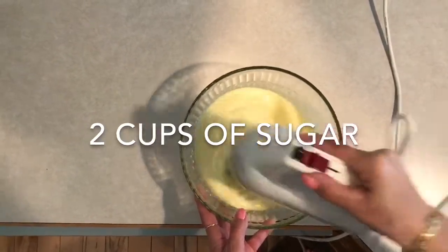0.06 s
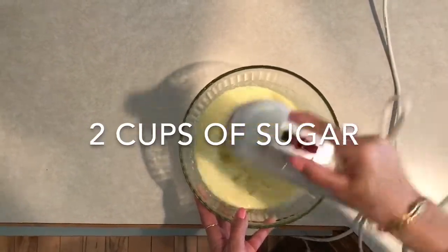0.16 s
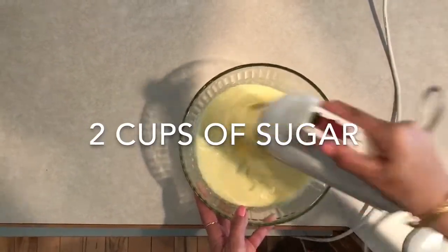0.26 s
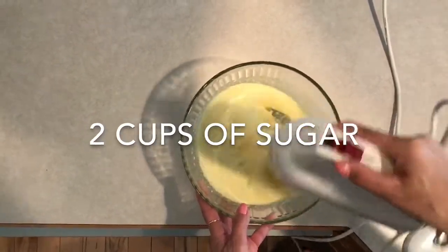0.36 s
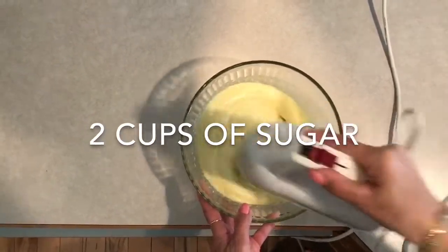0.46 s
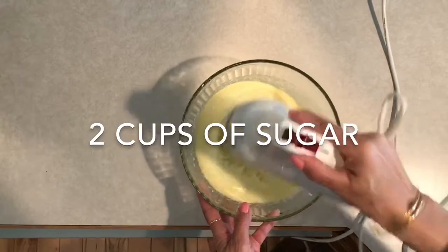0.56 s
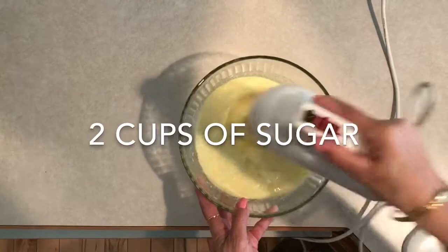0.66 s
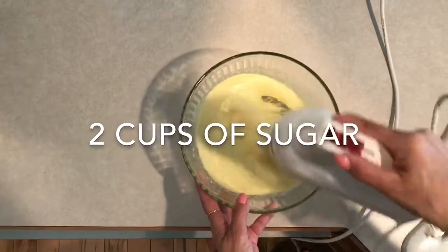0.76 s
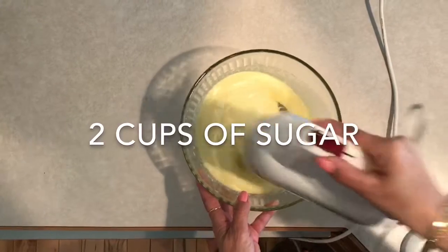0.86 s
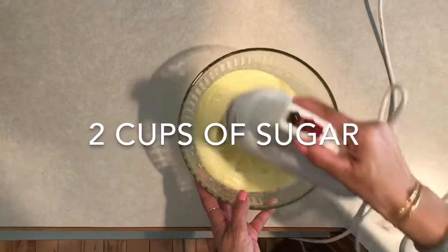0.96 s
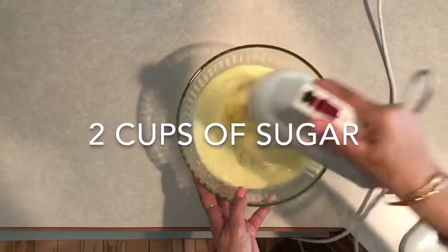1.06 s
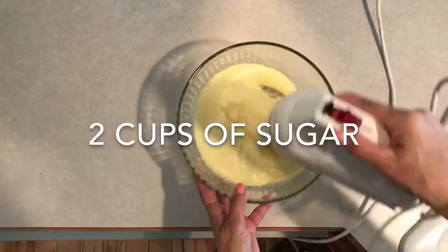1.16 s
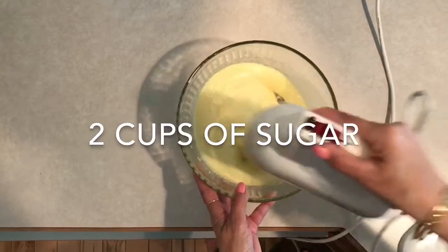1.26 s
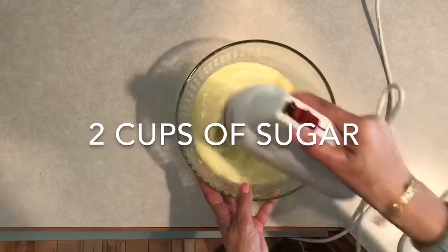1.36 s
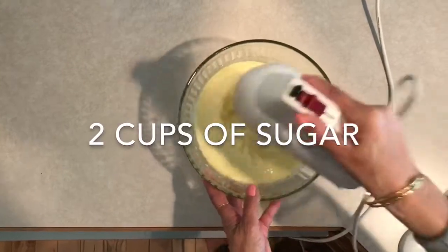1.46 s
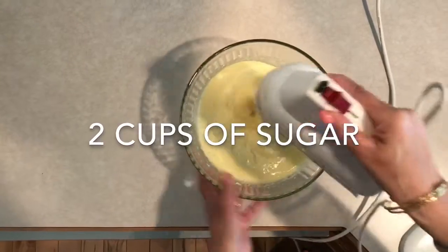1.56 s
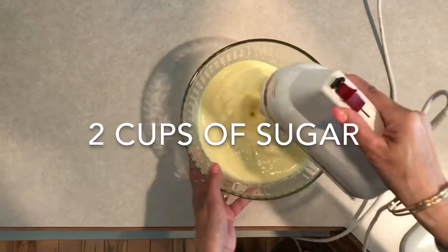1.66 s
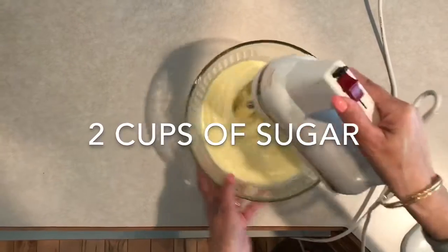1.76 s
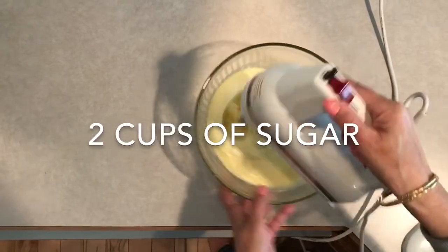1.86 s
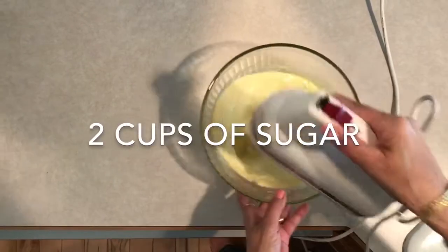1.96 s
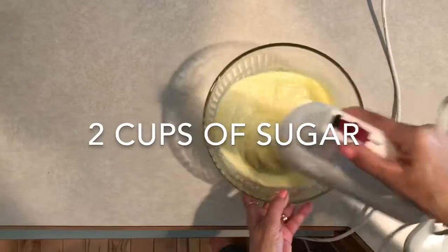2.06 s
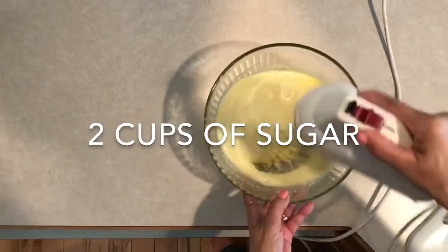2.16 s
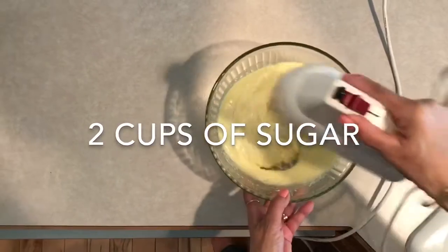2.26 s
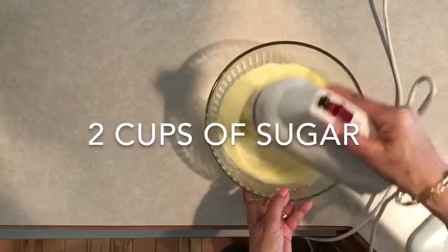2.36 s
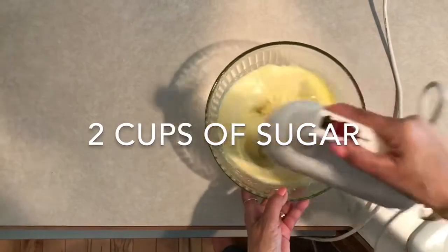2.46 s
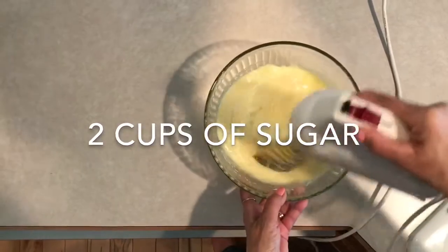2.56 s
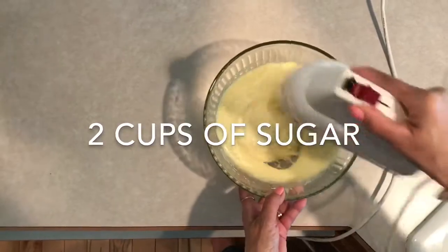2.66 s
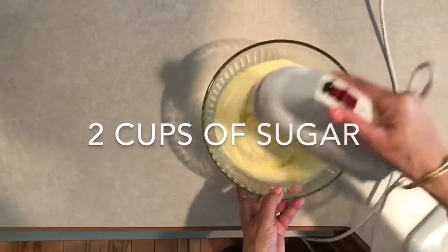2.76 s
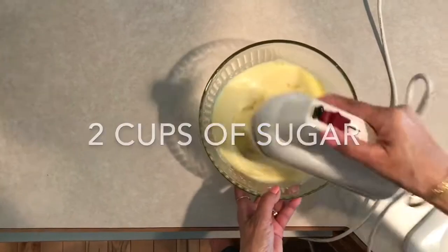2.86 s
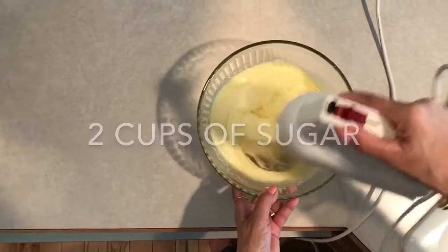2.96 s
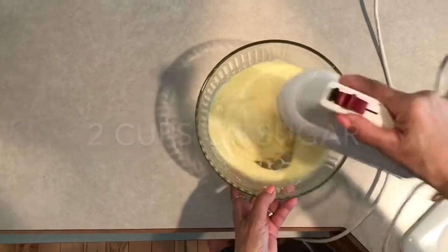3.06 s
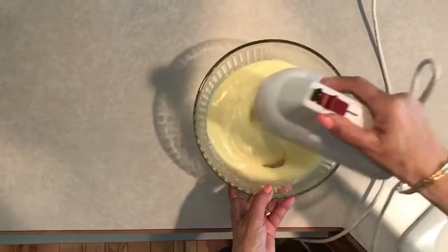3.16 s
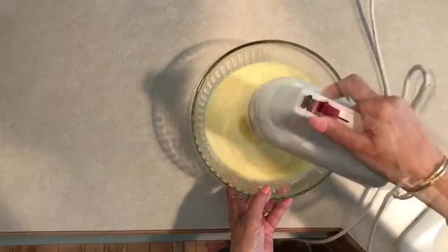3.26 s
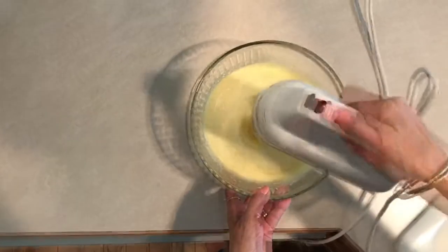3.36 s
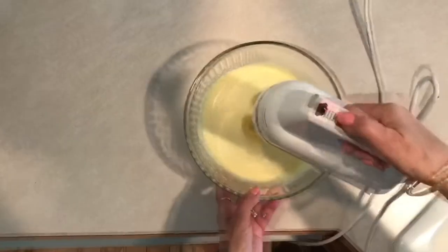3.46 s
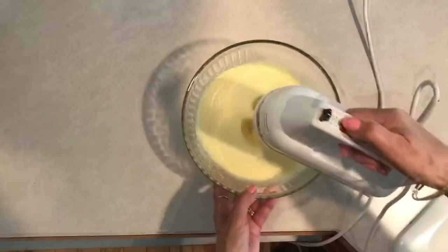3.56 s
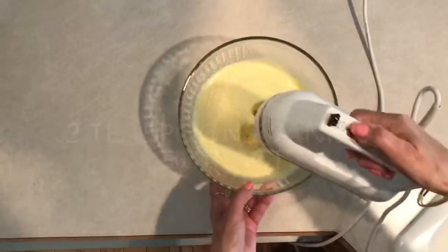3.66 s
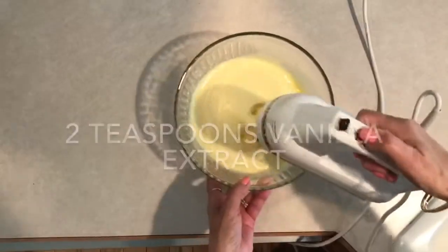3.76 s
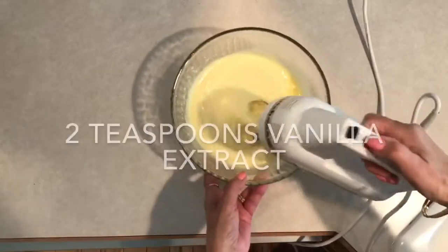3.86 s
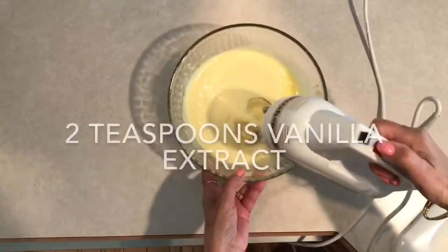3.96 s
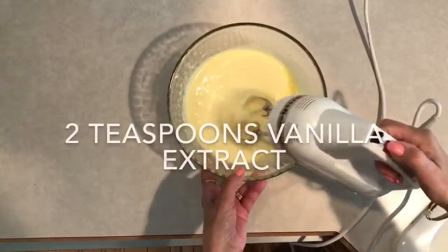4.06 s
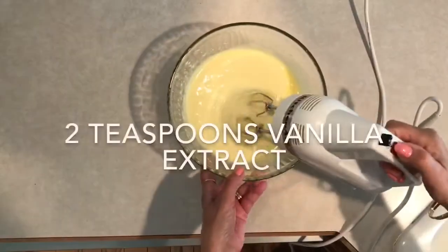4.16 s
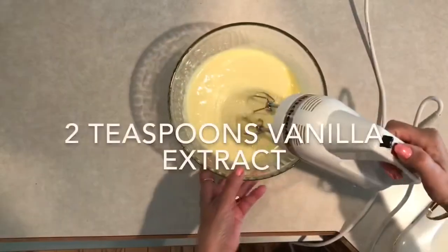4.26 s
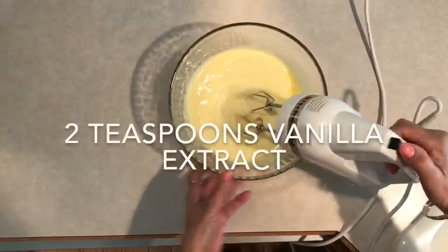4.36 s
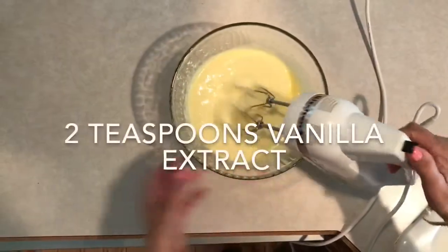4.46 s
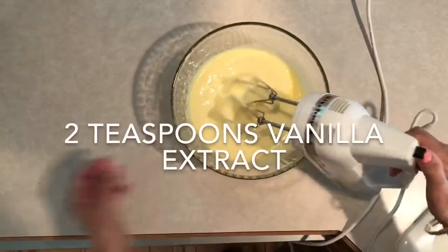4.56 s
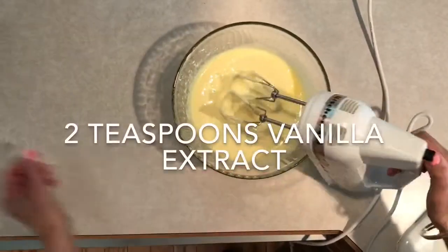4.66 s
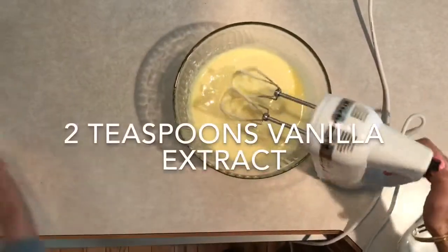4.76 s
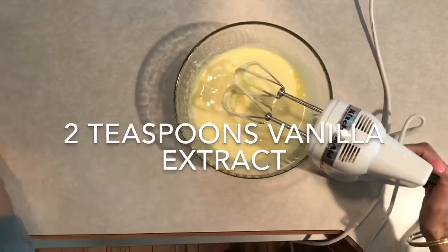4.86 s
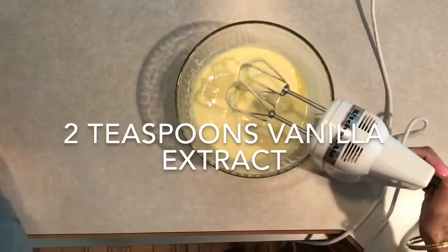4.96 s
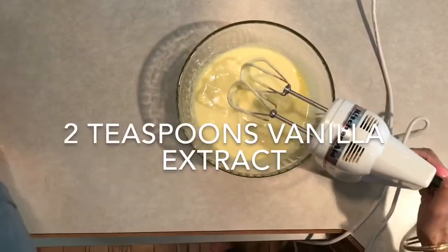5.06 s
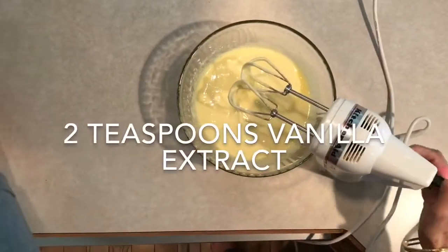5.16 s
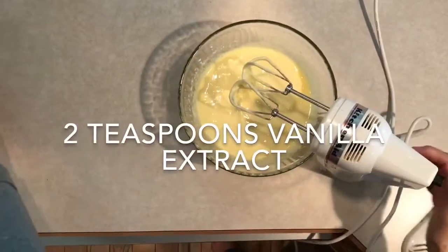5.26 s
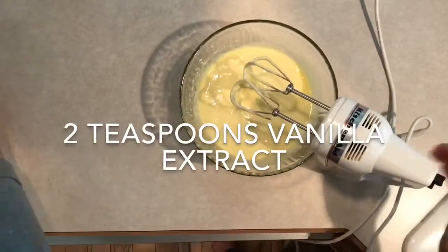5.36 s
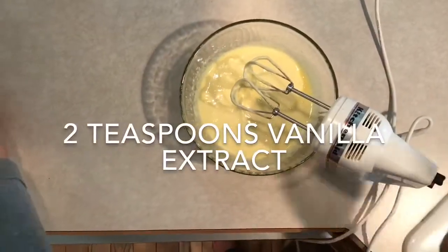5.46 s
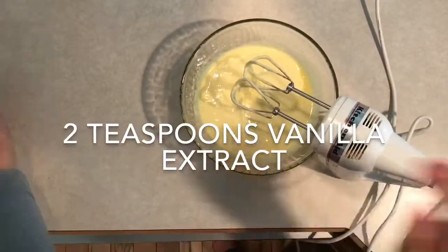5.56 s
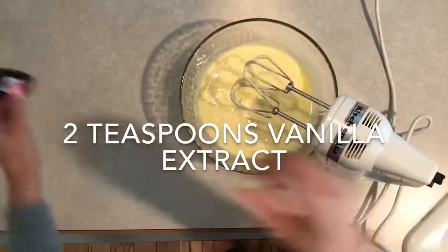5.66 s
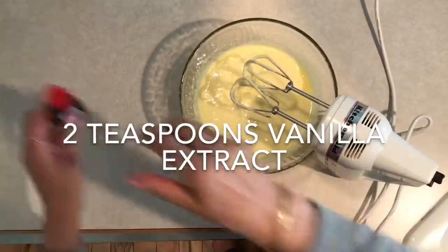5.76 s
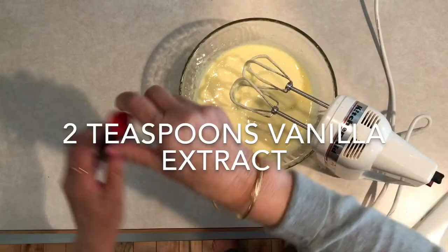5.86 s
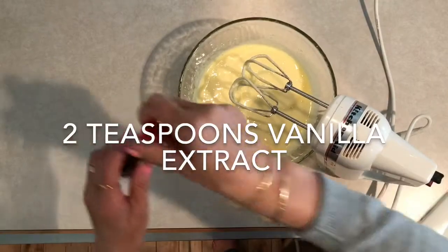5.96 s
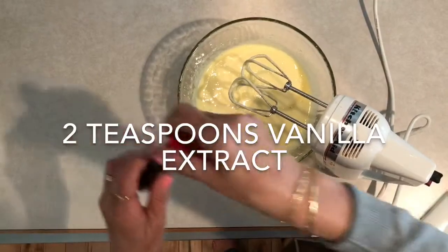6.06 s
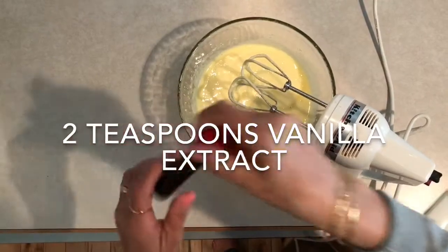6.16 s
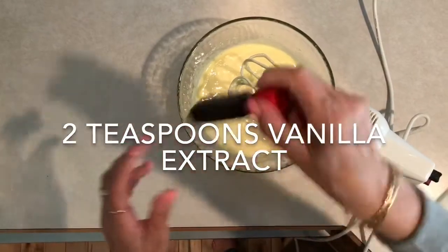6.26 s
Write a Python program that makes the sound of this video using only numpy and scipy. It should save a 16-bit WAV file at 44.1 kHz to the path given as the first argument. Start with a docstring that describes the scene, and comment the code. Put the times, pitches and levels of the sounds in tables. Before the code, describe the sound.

Close above a kitchen counter, an electric hand mixer whirs with a high whine while its beaters rattle, clink and drone unevenly in a glass bowl of batter. After about three seconds the switch clicks, the motor coasts down in pitch, and the mixer is set down with sharp knocks. Then quiet room hum, small scuffs and delicate bangle jingles.

```python
"""A kitchen counter, heard from a phone close above: a hand mixer beats batter in a glass bowl.
The motor is throbbing noise plus a whine of harmonics; beaters spray taps into bowl resonances and drone the counter.
The steady whir and whine fade while a separate coasting whine falls; the mixer is knocked down on the counter.
Bangles jingle as struck metal modes, light scuffs ring a sliding thing, and a fridge hums in a quiet room."""
import sys
import numpy as np
from scipy import signal
from scipy.fft import rfft, irfft
from scipy.io import wavfile
from scipy.ndimage import uniform_filter1d

SR = 44100
rng = np.random.default_rng(int(sys.argv[2]) if len(sys.argv) > 2 else 0)


def unload_wav(signal):
    """Save mono or channel-first audio to the path in sys.argv[1] as 16-bit WAV at rate SR, clipped to [-1, 1]."""
    wavfile.write(
        sys.argv[1],
        SR,
        np.round(np.clip(np.atleast_2d(signal).T, -1, 1) * 32767).astype(np.int16),
    )


def ratio_of_db(decibels):
    """Turn decibels (scalar or array-like) into linear amplitude factors; 0 dB maps to 1."""
    return 10 ** (np.asarray(decibels, float) / 20)


N = 278712
T = np.arange(N) / SR

# Steady running motor, its whine fading out while a separate coasting whine falls.
# Each row: time in seconds, commutator rate in Hz, relative whine level in dB.
MOTOR_SPEED = [(0.0, 2358, 3), (0.22, 2370, 2), (0.4, 2330, 4), (0.57, 2367, 2), (0.82, 2325, 2),
               (0.95, 2345, 1), (1.2, 2312, -6), (1.4, 2345, 3), (1.78, 2382, -1), (2.05, 2355, 3),
               (2.3, 2332, -5), (2.5, 2374, -3), (2.75, 2342, -5), (3.0, 2364, -2), (3.15, 2360, -6),
               (3.35, 2412, -3), (3.55, 2400, -5), (3.7, 2390, -30)]
# Harmonics of the whine. Each row: multiple of the commutator rate, relative level in dB.
WHINE_HARMONICS = [(1, -54), (2, -49.5), (3, -53), (4, -59), (5, -58), (6, -58)]
# Air and brush noise of the motor. Each row: time in seconds, relative level in dB.
WHIR_LEVEL = [(0.0, -37.5), (0.57, -36.5), (1.96, -37.5), (3.09, -38), (3.74, -45.5), (3.97, -49),
              (4.15, -60.5), (4.32, -100)]
# Spectrum of that noise. Each row: frequency in Hz, relative density in dB per Hz.
WHIR_COLOUR = [(60, -11.5), (105, 3), (150, -7), (440, -14), (1000, -38.5), (2070, -21.5), (3030, -17.5),
               (5300, -24), (7100, -21), (8600, -23), (10300, -29.5), (11100, -27.5), (14200, -27),
               (15800, -31)]
# The motor switched off and slowing evenly. Each row: time in seconds, commutator rate in Hz, relative level in dB.
COAST_DOWN = [(3.28, 2400, -58), (3.48, 1830, -50), (3.74, 1080, -42), (3.95, 500, -58), (4.1, 80, -75)]
# Motor housing resonances. Each row: frequency in Hz, width in Hz, gain in dB for each of two passes.
HOUSING = [(3150, 900, -3), (4300, 700, -4), (6200, 650, 0), (8600, 900, -7), (11300, 2000, -9)]
# Beaters turning free in the batter. Each row: time in seconds, rattle level in dB, bowl boom level in dB,
# counter drone level in dB at the crest of a throb.
FREE_CHURN = [(0.0, -34.5, -40.5, -28.5), (1.0, -38, -43.5, -30), (2.0, -34.5, -38, -30.5),
              (3.25, -39, -46, -35), (3.7, -42.5, -47.5, -32.5), (4.0, -47, -47.5, -36.5),
              (4.09, -55, -49, -30)]
# The hand sweeps the beaters against the glass. Each row: firmest contact in seconds, half length in seconds,
# rattle level in dB, treble in dB above the rattle, bowl boom level in dB.
GLASS_SWEEPS = [(0.081, 0.034, -27, -1.5, -42.5), (0.285, 0.044, -33.5, -12, -39.5),
                (0.446, 0.035, -27, -2.5, -48), (0.642, 0.043, -35.5, -1.5, -55),
                (0.737, 0.039, -30.5, -25, -32), (0.884, 0.036, -22, -3.5, -40),
                (1.134, 0.075, -29, -17, -34.5), (1.304, 0.04, -25, -4, -37.5),
                (1.618, 0.058, -24.5, -11, -29), (1.873, 0.076, -32.5, -10.5, -37.5),
                (2.16, 0.069, -28.5, -5.5, -46), (2.264, 0.042, -23.5, -6.5, -25.5),
                (2.55, 0.051, -29, -5.5, -41), (2.72, 0.052, -25.5, -3, -24), (2.987, 0.04, -28, -4.5, -39),
                (3.136, 0.066, -29, -5.5, -30)]
# The bowl pressed down so the counter drones. Each row: start in seconds, length in seconds, level in dB, pitch in Hz.
COUNTER_SHAKES = [(0.04, .13, -20.5, 85), (0.415, .105, -21.5, 84.5), (0.825, .14, -19.5, 84.5),
                  (1.2, .175, -20.5, 83), (1.36, .65, -25.5, 81.5), (2.19, .265, -23.5, 86),
                  (2.5, .15, -28, 82.5), (2.61, .29, -22, 85), (2.94, .12, -29, 81), (3.04, .18, -24, 86.5)]
# Full bowl, low and middle modes. Each row: frequency in Hz, width in Hz, gain in dB.
BOWL_MODES = [(522.4, 330, -7), (784, 127, 0), (989, 119, 3), (1338, 200, 0.5), (1540, 76.5, 4.5),
              (1940, 273, -4)]
# Full bowl, high modes. Each row: frequency in Hz, width in Hz, gain in dB.
BOWL_HIGH_MODES = [(2357, 30, 3), (2830, 365, 0.5), (3260, 600, -1.5), (4440, 220, -3.5),
                   (5470, 1300, -13.5), (8600, 2500, -16), (12760, 920, -21.5)]
# Low modes of the bowl wall. Each row: frequency in Hz, width in Hz, gain in dB.
WALL_BOOM_MODES = [(122, 16, -16), (198.9, 16.8, 0), (224.4, 28.4, 0.5), (272, 32, -4.5)]
# Steel on glass. Each row: time in seconds, relative level in dB, place (0 rim, 1 bottom, 2 and up deep under batter).
CLINKS = [(0.0669, -10, 1.52), (0.2115, -12.5, .1), (0.2214, -13.5, .1), (0.418, -9.5, 2.8),
          (0.627, -13, .1), (0.6464, -16.5, 0.091), (0.9115, -11.5, 0.9), (1.047, -10, .1),
          (1.07, -13.5, 0.12), (1.086, -14, 1.9), (1.211, -21, 0.95), (1.267, -6.5, 1.78),
          (1.313, -13, 0.68), (1.4544, -14, 0.092), (1.548, -14, 2), (1.9188, -22.5, .1),
          (1.948, -14, 1.07), (2.057, -12.5, 1.5), (2.1284, -17.5, 0.61), (2.212, -12, 2.4),
          (2.3624, -16, .1), (2.4477, -15.5, 1.1), (2.4986, -11, 0.93), (2.5498, -12.5, 0.87),
          (2.638, -8.5, 1.87), (2.798, -14, 1.3), (2.8953, -14.5, 1.26), (2.9455, -5, 1.1),
          (3.194, -16.5, 0.068)]
# Glass modes. Each row: frequency in Hz, dB when struck at the rim, dB when struck at the bottom.
GLASS_MODES = [(1420, -0.5, -16.5), (1750, -22, -2), (2250, -18, 1), (2730, 5.5, -4.5), (3150, -5.5, 3.5),
               (3810, -16, -3.5), (3840, -4, -13), (4476, 0.5, -5), (4835, -2.5, -21), (5840, -15, -6.5),
               (5900, -21, -5), (6850, -19.5, -8.5), (7680, -17.5, -17), (9600, -10, -24.5)]
# Mixer and bowl set down. Each row: time in seconds, relative crack level in dB, relative thump level in dB,
# peak of the glass ring in dB.
KNOCKS = [(4.089, -23, -50, -46), (4.105, -10.5, -25.5, -46), (4.132, -16.5, -23, -27.5),
          (4.157, -39, -31.5, -56), (4.352, -41.5, -58, -67), (4.409, -26.5, -54, -65),
          (4.484, -38, -52.5, -63), (4.784, -26.5, -44.5, -54), (4.8, -23, -29.5, -57),
          (4.833, -33.5, -43, -60.5), (4.871, -28, -33.5, -55)]
# Plastic shell of the mixer. Each row: frequency in Hz, relative level in dB, 60 dB decay in seconds.
SHELL_MODES = [(480, 0, .04), (775, 4, .05), (1075, 0, .045), (1440, -4, .035), (2430, -4, .03),
               (2960, -5, .04)]
# Counter resonances. Each row: frequency in Hz, width in Hz, gain in dB.
COUNTER_MODES = [(83.8, 9, 1), (125.4, 22, -3), (212, 30, 8), (380, 120, -7), (700, 260, -11),
                 (1220, 400, -13)]
# Bowl knocked from outside. Each row: frequency in Hz, relative level in dB, 60 dB decay in seconds.
OUTER_RING_MODES = [(2085, 0, .15), (2110, -3, .12), (3180, -7, .11), (4500, -2, .06), (6020, -14, .1)]
# Thumb on the plastic switch. Each row: time in seconds, peak in dB, lower band edge in Hz.
SWITCH_TICKS = [(3.3023, -29, 4000), (3.328, -31, 5400), (3.349, -23, 3960), (3.388, -28, 5400),
                (3.954, -30.5, 5400), (3.9648, -34, 2500), (3.991, -30.5, 1310)]
# Bangles touching. Each row: time in seconds, relative level in dB, dB added to the overtones below 8 kHz.
JINGLES = [(4.623, -56.5, 2), (4.922, -56, 11), (5.5288, -54, -9), (5.5468, -51.5, 2.5), (5.561, -52.5, -6),
           (5.5748, -49.5, -1), (5.7813, -56, -6), (5.891, -57.5, -4.5), (5.9066, -53.5, -6.5),
           (5.9208, -48.5, -3), (6.077, -43, 1), (6.1404, -54.5, -7.5), (6.2227, -48, -11.5),
           (6.265, -47, -4), (6.285, -45, 8)]
# Bangle overtones. Each row: frequency in Hz, relative level in dB, 60 dB decay in seconds.
BANGLE_MODES = [(3540, -17, 0.071), (4170, -14.5, 0.1), (5240, -11, 0.13), (6855, -6.5, 0.21),
                (7700, -15.5, 0.08), (9140, -3.5, 0.11), (9540, -6.5, 0.071), (9800, -5, 0.25),
                (11550, 3, 0.13), (11200, -3, 0.071), (12170, -6.5, 0.15), (12800, -2, 0.17),
                (14400, -1.5, 0.18), (14800, -6.5, .06)]
# Something slides lightly on the counter. Each row: start in seconds, length in seconds, level in dB,
# gain of the squeak resonance in dB, squeak frequency in Hz, factor on the body frequencies.
SCUFFS = [(4.706, 0.045, -62, -8.5, 4400, 1.15), (5.278, 0.019, -56, -22.5, 3180, 0.89),
          (5.294, 0.054, -55.5, -21, 3220, 0.96), (5.358, 0.057, -55.5, -15, 3360, 1.13),
          (5.389, 0.038, -57.5, -19, 3900, 1.14)]
# Body of the sliding thing. Each row: frequency in Hz before the pitch factor, width in Hz, gain in dB.
SLIDE_MODES = [(426, 47, 6), (928, 130, -3), (1260, 79, -5), (1960, 220, -18)]
# Fridge hum. Each row: frequency in Hz, level in dB.
FRIDGE_HUM = [(59.2, -64), (118.4, -63.5), (236.9, -75.5), (296.1, -69.5), (355.3, -71.5)]
# Spectrum of the room tone. Each row: frequency in Hz, relative density in dB per Hz.
KITCHEN_COLOUR = [(15, -40), (25, -5), (113, -4.5), (170, -8.5), (299, -6), (672, -15), (4820, -29.5),
                  (7030, -30), (10300, -33), (11700, -31.5), (15800, -41)]


def level(x, db):
    """Scale to an rms level in dB."""
    return x * ratio_of_db(db) / np.sqrt(np.mean(x ** 2))


def curves(table):
    """Columns of a table drawn over time; a column ending below zero drops to -120 after its last point."""
    seconds, *columns = np.transpose(table)
    return [np.interp(T, seconds, c, right=-120 if c[-1] < 0 else c[-1]) for c in columns]


def resonate(x, peaks):
    """Sum of two-pole resonances with alternating polarity."""
    out = 0
    for k, (hz, width, db) in enumerate(peaks):
        b, a = signal.iirpeak(hz, hz / width, SR)
        out = out + (-1) ** k * ratio_of_db(db) * signal.lfilter(b, a, x)
    return out


def coloured(points):
    """Noise of rms 1 whose spectrum is drawn through the points on a log frequency axis."""
    hz, db = np.transpose(points)
    bins = np.fft.rfftfreq(N, 1 / SR)
    shape = ratio_of_db(np.interp(np.log(bins + 1), np.log(hz), db))
    return level(irfft(rfft(rng.standard_normal(N)) * shape, N), 0)


def walk(rate):
    """Smooth random wandering with a spread near 1; rate is in new values per second."""
    k = int(SR / rate)
    steps = np.repeat(rng.standard_normal(N // k + 1), k)
    return 1.3 * uniform_filter1d(uniform_filter1d(steps, k), k)[:N]


def ring(hz, db, t60, scatter_db, length=.35):
    """Decaying modes struck once, each blow with its own balance; peak 1."""
    t = np.arange(int(length * SR))[:, None] / SR
    balance, phase = rng.standard_normal((2, len(hz)))
    modes = ratio_of_db(db + scatter_db * balance) * np.sin(2 * np.pi * hz * t + phase) * ratio_of_db(-60 * t / t60)
    y = modes.sum(axis=1) * (1 - np.exp(-t[:, 0] / 0.00029))  # soft onset
    return y / np.abs(y).max()


def crack(t60, lo_hz, hi_hz):
    """A short decaying burst of band-limited noise; peak 1."""
    t = np.arange(4000) / SR
    band = signal.butter(2, [lo_hz, hi_hz], "bandpass", fs=SR, output="sos")
    y = signal.sosfilt(band, rng.standard_normal(4000)) * ratio_of_db(-60 * t / t60)
    return y / np.abs(y).max()


def add(out, s, y):
    """Mix a sound in at a time in seconds."""
    i = int(s * SR)
    out[i:i + len(y)] += y[:N - i]


def swells(shapes, db):
    """Shapes (rows) at their levels, added as power."""
    return ((shapes * ratio_of_db(db)[:, None]) ** 2).sum(axis=0)


def spray(density):
    """Uneven taps at random moments over a bed of noise; density is in taps per sample."""
    size = ratio_of_db(np.minimum(3 * rng.exponential(size=N), 8))
    taps = (rng.random(N) < density) * size * rng.uniform(-1, 1, N)
    return level(taps, 0) + .6 * rng.standard_normal(N)


def motor():
    """Fan and brush noise that throbs once a turn of the twelve-bar armature, with the commutator's whine."""
    (hz, whine_db), (whir_db,) = curves(MOTOR_SPEED), curves(WHIR_LEVEL)
    bars = np.cumsum(hz * (1 + .003 * walk(60) + .002 * walk(9))) / SR
    throb = 1 + 0.2 * np.cos(2 * np.pi * bars / 12)
    whir = coloured(WHIR_COLOUR) * throb * ratio_of_db(1.9 * walk(20))
    whine = 0
    for k, line_db in WHINE_HARMONICS:
        line_level = ratio_of_db(line_db + whine_db + 2.5 * walk(9) + 3 * walk(150))
        whine = whine + line_level * np.sin(2 * np.pi * k * bars)
    return ratio_of_db(whir_db) * level(whir, 3.93) + whine


def coasting():
    """Brushes tick unevenly over the bars, ever slower; overtones light up as they cross the housing resonances."""
    hz, db = curves(COAST_DOWN)
    bars = np.cumsum(hz * (1 + .011 * walk(130))) / SR
    ticks = sum((k * hz < 16000) * np.cos(2 * np.pi * k * bars) for k in range(1, 30))
    ticks = ticks * (T > COAST_DOWN[0][0]) * (1 + 1.1 * rng.standard_normal(N))
    # two passes through each resonance steepen its skirts
    housed = sum(resonate(resonate(ticks, [peak]), [peak]) for peak in HOUSING)
    return ratio_of_db(db + 3 * walk(30)) * housed


def beaters():
    """Each passing wire thumps the counter and sets off a spray of uneven taps on the glass."""
    churn_treble_db = -6
    switch_s, throb_on_s, throb_off_s = 3.27, .0745, .165  # seconds a throb before and after the switch
    shake_round = .55  # 0 square, 1 arched

    churn_db, idle_boom_db, idle_drone_db = curves(FREE_CHURN)
    firmest, half, rattle_db, treble_db, boom_db = np.transpose(GLASS_SWEEPS)
    contact = np.exp(-((T - firmest[:, None]) / half[:, None]) ** 2 / 2)
    low = np.sqrt(swells(contact, rattle_db) + ratio_of_db(2 * churn_db))
    high = np.sqrt(swells(contact, rattle_db + treble_db) + ratio_of_db(2 * (churn_db + churn_treble_db)))
    boom = np.sqrt(swells(contact, boom_db) + ratio_of_db(2 * idle_boom_db))

    start, length, shake_db, hz = np.transpose(COUNTER_SHAKES)
    progress = np.clip((T - start[:, None]) / length[:, None], 0, 1)
    pressed = np.sin(np.pi * progress).clip(0) ** shake_round
    throb = np.sin(np.pi * (T - switch_s) / np.where(T < switch_s, throb_on_s, throb_off_s))
    idle = ratio_of_db(idle_drone_db + 2.0 * walk(8.5)) * throb * (1 - pressed.max(axis=0))
    shake = np.sqrt(swells(pressed, shake_db)) + 1j * idle  # the two lie a quarter cycle apart
    pitch = np.interp(T, start + length / 2, hz, right=83.5)
    phase = np.cumsum(pitch * (1 + .02 * walk(30))) / SR
    drone = np.sqrt(2) * np.imag(np.exp(2j * np.pi * phase) * shake) * ratio_of_db(1.2 * walk(25))

    density = 800 * (.3 + np.exp(-(phase % 1) / .3)) / SR  # taps crowd the start of each drone cycle
    taps = spray(2 * density)
    # batter cushions the blows that drive the low modes
    soft = uniform_filter1d(uniform_filter1d(spray(density), size=9), size=9)
    rattle = low * level(resonate(soft, BOWL_MODES), 0) + high * level(resonate(taps, BOWL_HIGH_MODES), 0)
    flicker_db = 1.6 * walk(40)
    return drone + ratio_of_db(flicker_db) * rattle + boom * level(resonate(soft, WALL_BOOM_MODES), 0)


def clinks():
    """A beater strikes the glass; where it lands sets the balance of the modes, and batter muffles them."""
    out = np.zeros(N)
    hz, rim_db, bottom_db = np.transpose(GLASS_MODES)
    for s, db, place in CLINKS:
        depth, bare = np.clip(place, 0, 1), np.clip(2 - place, 0, 1)
        detune = 1 + .025 * rng.standard_normal(len(hz))
        balance_db = (1 - depth) * rim_db + depth * bottom_db
        # the batter damps the ring to 17 ms
        modes = ring(hz * detune, balance_db, t60=.017, scatter_db=2.5, length=.05)
        add(out, s, bare * ratio_of_db(db + 1) * modes)
        add(out, s, bare * ratio_of_db(db - 3) * crack(.028, 2300, 6500))
        thud = resonate(crack(0.019, 300, 1500), BOWL_MODES)
        add(out, s, depth * ratio_of_db(db - 8) * thud / np.abs(thud).max())
    return out


def knocks():
    """Plastic cracks, a short push with a rattle thumps the counter, the bowl rings on."""
    out = np.zeros(N)
    for s, crack_db, thump_db, ring_db in KNOCKS:
        add(out, s, ratio_of_db(crack_db - 12) * crack(0.07, 600, 4200))
        add(out, s, ratio_of_db(crack_db - 12.5) * ring(*np.transpose(SHELL_MODES), scatter_db=4, length=.15))
        blow = 0.9 * np.pad(crack(0.13, 142, 1720), (0, 8000))
        blow[:60] += np.hanning(60)
        thump = resonate(blow, COUNTER_MODES)
        add(out, s, ratio_of_db(thump_db + 7.5) * thump / np.abs(thump).max())
        add(out, s, ratio_of_db(ring_db) * ring(*np.transpose(OUTER_RING_MODES), scatter_db=1.5))
    return out


def tap_cluster():
    """Six soft pushes on the upper counter modes crowd into 14 ms and merge into one rough bump."""
    out = np.zeros(N)
    tap = resonate(np.pad(np.hanning(60), (0, 4000)), COUNTER_MODES[2:])
    tap = tap / np.abs(tap).max()
    for k in range(6):
        add(out, 3.8 + .022 * k * 0.55 ** k, ratio_of_db(-26 + k) * tap)
    return out


def switch_ticks():
    """The thumb moves the plastic switch: short bright bursts of noise."""
    out = np.zeros(N)
    for s, db, lo_hz in SWITCH_TICKS:
        add(out, s, ratio_of_db(db) * crack(0.032, lo_hz, 10300))
    return out


def bangles():
    """Thin metal rings chime on different overtones at every touch and rebound against each other."""
    rebound_s, rebound_db = 0.0059, -7.5  # longest delay and level change for each rebound
    stir_count, stir_s = 60, 3.3  # random chinks while the hand stirs, up to this second
    stir_db, stir_t60 = -34, .024  # typical peak; decay in seconds, damped by the wrist

    out = np.zeros(N)
    hz, mode_db, t60 = np.transpose(BANGLE_MODES)
    for s, db, low_db in JINGLES:
        balance_db = mode_db + low_db * (hz < 8000)
        for k in range(3):
            detune = 1 + .005 * rng.standard_normal(len(hz))
            chime = ring(hz * detune, balance_db, t60, scatter_db=5.5, length=.3)
            add(out, s + k * rebound_s * rng.uniform(0.43, 1.0), ratio_of_db(db - 4 + k * rebound_db) * chime)
        add(out, s, ratio_of_db(db - 4) * crack(.08, 8200, 20000))
    for s in stir_s * rng.random(stir_count):
        chink = ring(hz * rng.uniform(.96, 1.04), mode_db, stir_t60, scatter_db=7, length=.06)
        add(out, s, ratio_of_db(stir_db + 3 * rng.standard_normal()) * chink)
    return out


def scuffs():
    """Brief stick-slip bumps: uneven clicks and a little rubbing noise ring the sliding thing."""
    out = np.zeros(N)
    for s, length, db, squeak_db, hz, pitch in SCUFFS:
        n = int(length * SR)
        grip = .4 + 9 * (rng.random(n) < .005)  # rare strong slips over a light rub
        rub = np.zeros(8000)
        rub[:n] = rng.standard_normal(n) * grip * np.hanning(n) ** .25
        body_modes = [(f * pitch, width, gain_db) for f, width, gain_db in SLIDE_MODES]
        body = resonate(rub, body_modes) + resonate(rub, [(hz, 0.13 * hz, squeak_db)])
        add(out, s, body * ratio_of_db(db) / np.sqrt(np.mean(body[:n] ** 2)))
    return out


def kitchen():
    """Mains hum of a fridge, each harmonic drifting in level, over the noise of a quiet room."""
    hum = 0
    for hz, db in FRIDGE_HUM:
        hum = hum + np.sqrt(2) * ratio_of_db(db + 0.77 * walk(1.8)) * np.sin(2 * np.pi * hz * T)
    return hum + level(coloured(KITCHEN_COLOUR) * ratio_of_db(1.8 * walk(21.0)), -63)


def scene():
    """Near sources, their echo from hard walls as decaying noise, and the room tone."""
    near = motor() + coasting() + beaters() + clinks() + knocks() + tap_cluster() + switch_ticks()
    near = near + bangles() + scuffs()
    t = np.arange(SR // 2) / SR
    walls = rng.standard_normal(len(t)) * ratio_of_db(-60 * t / 0.52) * (t > .004)
    walls = signal.lfilter([.3], [1, -.7], walls)  # the echo is duller than the source
    echo = signal.fftconvolve(near, walls / np.sqrt(np.sum(walls ** 2)))[:N]
    return (near + ratio_of_db(-14) * echo + kitchen())[None]


def low_pass(x):
    """Removes everything above the highest recorded frequency."""
    return signal.sosfilt(signal.butter(12, 16600, fs=SR, output="sos"), x)


def record(dry):
    """The phone drops the deep bass below 44 Hz and the top above 15850 Hz."""
    bass_cut = signal.butter(4, 44, "highpass", fs=SR, output="sos")
    top_cut = signal.ellip(10, .3, 70, 15850, fs=SR, output="sos")
    mix = signal.sosfilt(top_cut, signal.sosfilt(bass_cut, dry))
    return low_pass(mix)


dry = scene()
out = record(dry)
unload_wav(out)
```